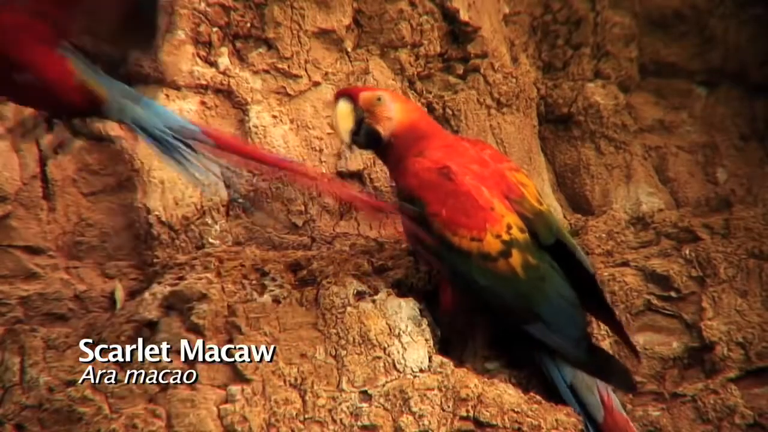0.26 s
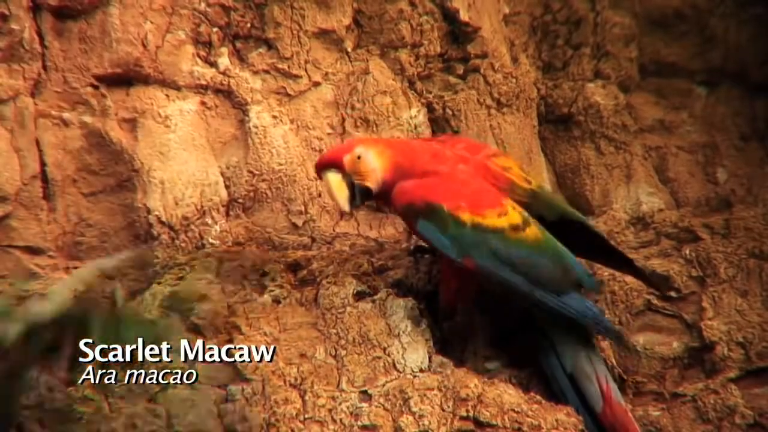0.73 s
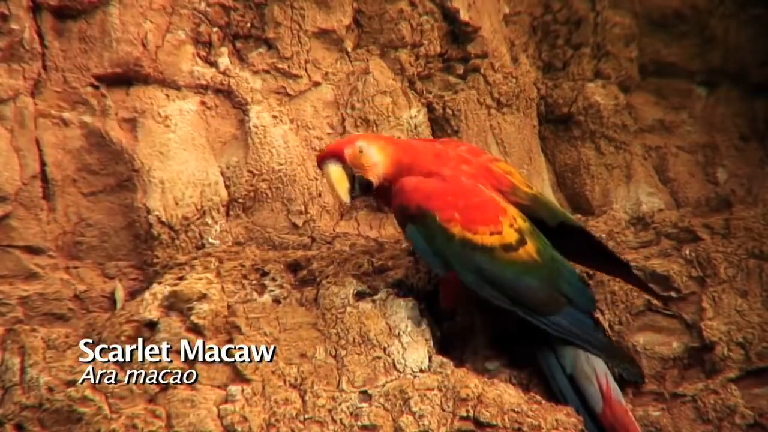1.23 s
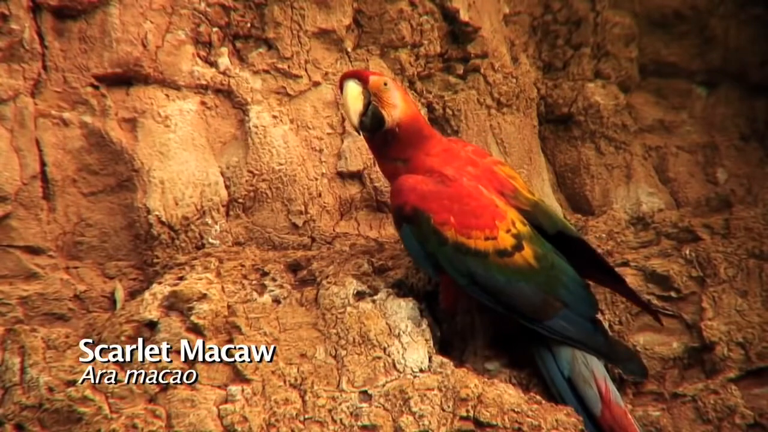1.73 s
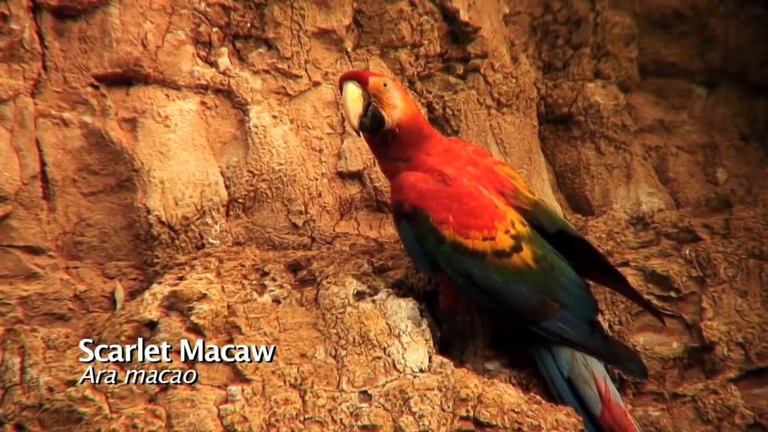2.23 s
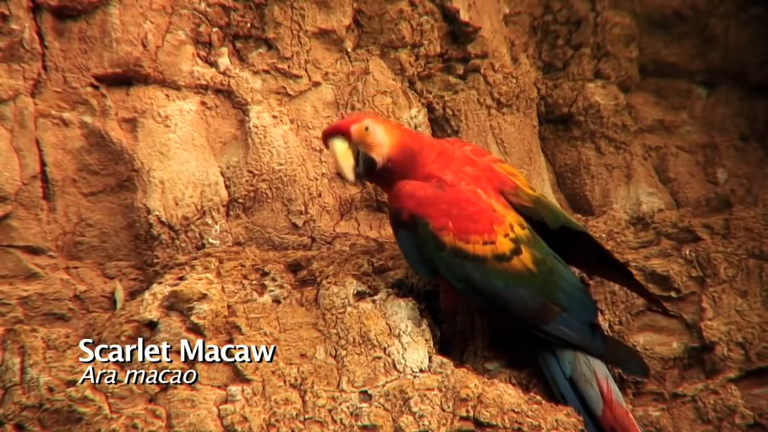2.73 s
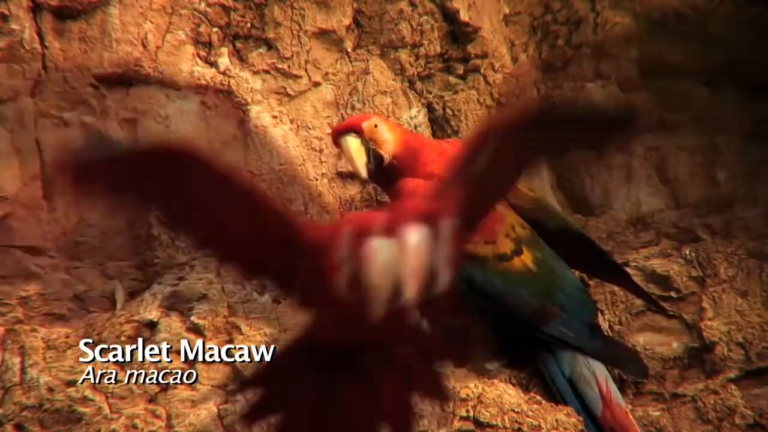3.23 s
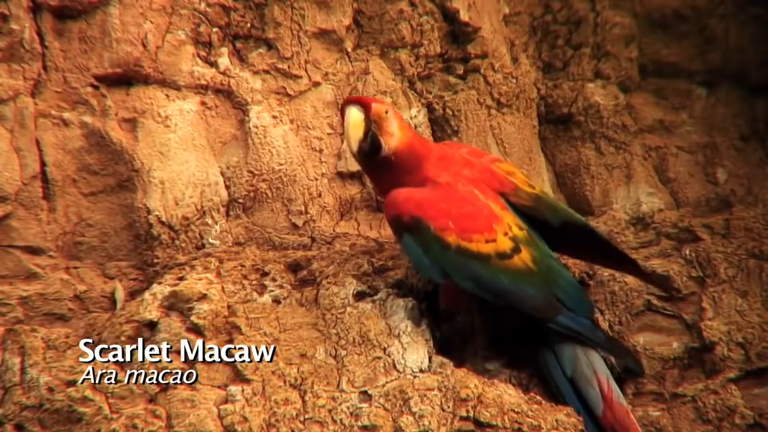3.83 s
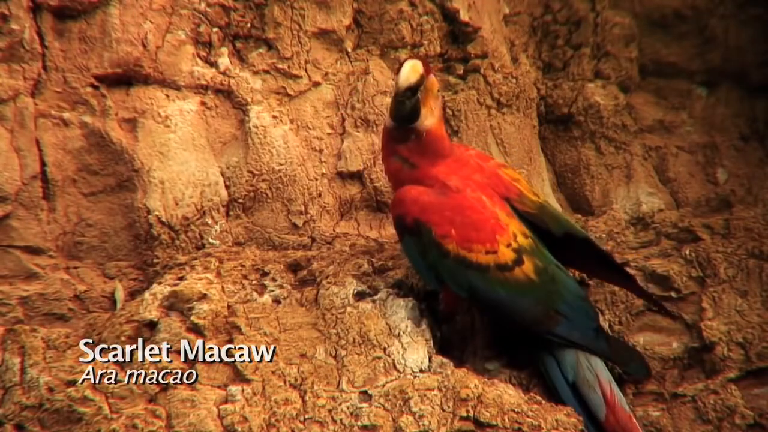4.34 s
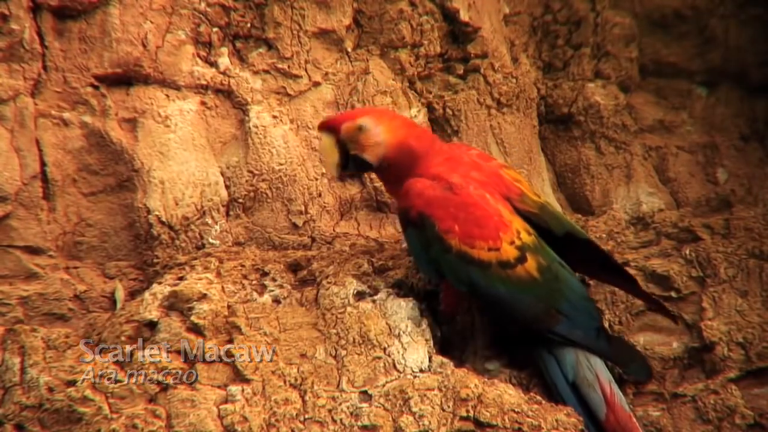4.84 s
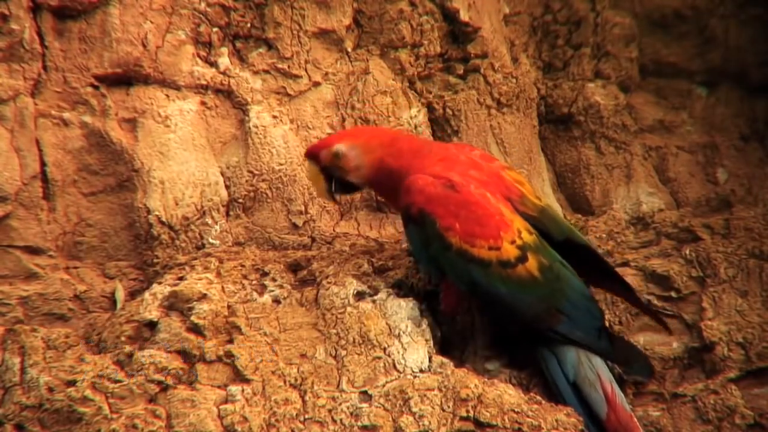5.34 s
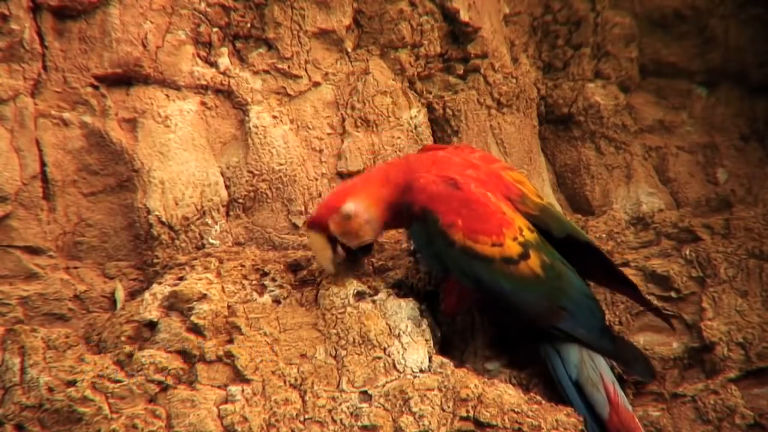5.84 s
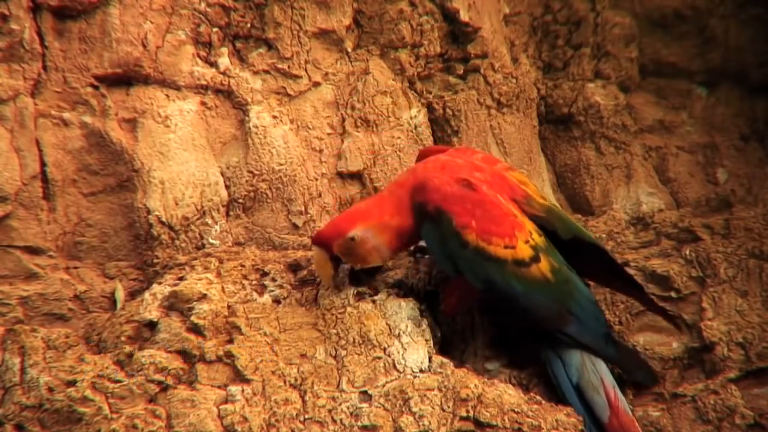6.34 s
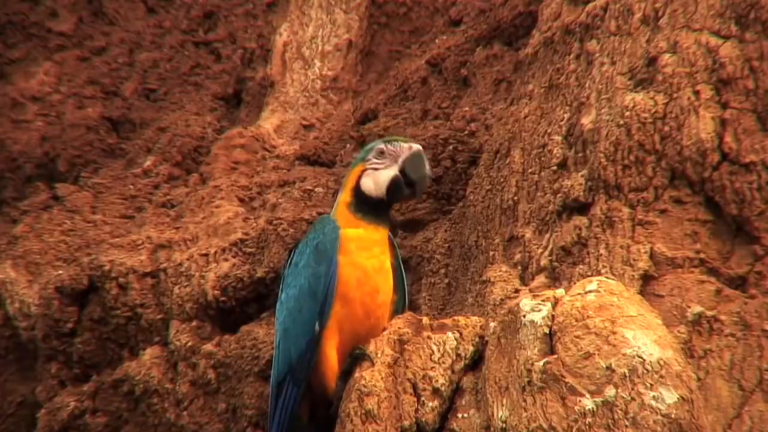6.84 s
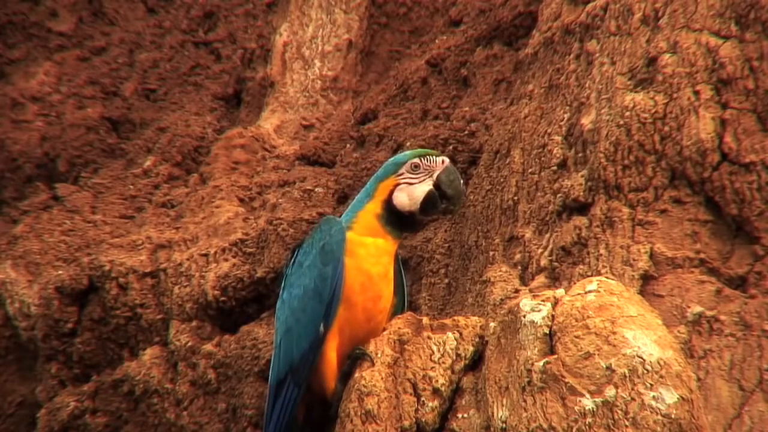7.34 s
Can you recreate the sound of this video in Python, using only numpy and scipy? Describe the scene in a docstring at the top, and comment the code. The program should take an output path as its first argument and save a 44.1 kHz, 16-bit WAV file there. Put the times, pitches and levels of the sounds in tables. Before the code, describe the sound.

A wide stereo outdoor scene of many macaws and parrots: far chatter swelling and sinking, nearer rasping squawks, quick screeches, tiny clucks and high chirps. Wings flutter and a few low puffs of air pass close. Loud squawks come early, dense screeching fills the middle, and it thins before chattering rises again. A steady high insect chorus, soft air and faint low rumble lie beneath, with a short natural echo.

```python
"""Far chatter, rustling feathers, a steady insect chorus and air come first: a flock on a forest clay cliff.
Macaws and parrots soon call over them: hoarse squawks, rattling screeches, a trilled cry, chirps and clucks.
Squawks, screeches and the cry are stacks of partials; chirps and clucks are short notes with an overtone.
Wing beats are low puffs; the bed is shaped noise. Trees and cliff answer the voices with a short echo."""
import sys
import numpy as np
from scipy import signal
from scipy.io import wavfile
from scipy.ndimage import uniform_filter1d

SR = 44100
rng = np.random.default_rng(int(sys.argv[2]) if len(sys.argv) > 2 else 0)


def convert_level_to_amplitude(level_db):
    """Map a level in decibels to its linear amplitude factor."""
    exponent = np.asarray(level_db, float) / 20
    return 10 ** exponent


def master(y):
    """Save y as 16-bit WAV."""
    cut = np.clip(np.atleast_2d(y).T, -1, 1)
    pcm = np.round(cut * 32767)  # scale
    wavfile.write(sys.argv[1], SR, pcm.astype(np.int16))


N = 334278

# how loud the far flock is, before each user's own offset: time_s [s], level_db [dB]
FLOCK = [(0, -31), (.55, -31), (1.6, -29), (2.8, -22.5), (3.4, -30.5), (3.8, -22.5), (4.02, -25.5),
         (4.2, -24), (4.8, -34), (5.7, -26), (6.3, -28.5), (7.1, -22.5), (7.58, -28.5)]


def unit(x):
    """Scales a signal to rms 1."""
    return x / np.sqrt(np.mean(np.abs(x) ** 2) + 1e-20)


def along(points, hz):
    """Reads a curve of (Hz, value) points on a log frequency axis."""
    f, v = np.transpose(points)
    return np.interp(np.log(hz + 1), np.log(f + 1), v, left=v[0], right=v[-1])


def at_times(points, t):
    """Reads a curve of (s, value) points at the times t."""
    return np.interp(t, *np.transpose(points))


def curves(rows):
    """Gives the first sample, then each column joined by straight lines from the first row to the last."""
    s, *columns = np.transpose(rows)
    n = np.arange(round(s[0] * SR), min(round(s[-1] * SR), N))
    return [n[0]] + [np.interp(n / SR, s, column) for column in columns]


def wobble(n, rate):
    """Makes a random curve of n samples by joining `rate` random knots a second."""
    knots = rng.standard_normal(int(n * rate / SR) + 2)
    return np.interp(np.arange(n) * rate / SR, np.arange(len(knots)), knots)


def rush(spectrum, patchy_db, size=512):
    """Makes stereo noise with patches of random gain: rms 1, then a little louder on the left."""
    # how alike left and right are: frequency_hz [Hz], likeness [-1 to 1]
    alike = [(60, 0.88), (180, 0.43), (550, 0.46), (1650, 0.59), (4970, -0.3), (15000, 0.41)]
    hz, _, z = signal.stft(rng.standard_normal((2, N)), SR, nperseg=size)
    patches = rng.standard_normal(z.shape[1:])
    patches = uniform_filter1d(uniform_filter1d(patches, 4, 0), 8, 1)
    inside = (hz >= spectrum[0][0]) & (hz <= spectrum[-1][0])
    color = convert_level_to_amplitude(along(spectrum, hz)) * inside
    z = z * convert_level_to_amplitude(patchy_db * unit(patches)) * color[:, None]
    # less likeness means more of the side signal
    turn = np.arccos(np.clip(along(alike, hz), -1, 1))[:, None] / 2
    mid, side = z[0] * np.cos(turn), z[1] * np.sin(turn)
    pair = signal.istft(np.array([mid + side, mid - side]), nperseg=size)[1][:, :N]
    return unit(pair) * convert_level_to_amplitude(np.array([[.7], [-.7]]))


def add(ports, start, voice, pan_db, fade_s=0.0052):
    """Places a voice between left and right with soft ends; positive pan_db leans left."""
    t = np.arange(len(voice)) / SR
    edge = np.clip(np.minimum(t, t[::-1]) / fade_s, 0, 1)
    ports[:, start:start + len(voice)] += voice * edge * convert_level_to_amplitude(np.array([[.5], [-.5]]) * pan_db)


def partials(pitch_hz, gains, hoarse, smear_hz, jitter):
    """Stacks partials of one pitch; hoarseness swaps each clean tone for a noisy, shaken copy."""
    n = len(pitch_hz)
    turn = 2 * np.pi * np.cumsum(pitch_hz * (1 + jitter * wobble(n, 150.4))) / SR
    shared = wobble(n, smear_hz)  # uneven closure of the syrinx shakes all partials together
    voice = 0
    for k, gain in enumerate(gains, 1):
        # high partials blur first
        clean = (1 - np.clip(hoarse, .03, 1)) ** (.5 + k * pitch_hz / 2500)
        phase = k * turn - 0.2744 * k * k  # the windpipe spreads each pulse in time
        rasp = 1.3 * (1 + .45 * shared) * np.sin(phase + 2.2 * wobble(n, smear_hz))
        # each partial's level wanders at random
        wandering_gain = gain * convert_level_to_amplitude(2 * wobble(n, 35))
        tone = np.sqrt(2 * clean) * np.sin(phase)
        voice = voice + wandering_gain * (tone + np.sqrt(1 - clean) * rasp)
    return voice / np.sqrt(sum(gain ** 2 for gain in gains))


def squawks():
    """Sounds squawks, caws and croaks as stacks lifted around two resonances, beak and throat."""
    beak_lift_db, throat_lift_db, lift_width_hz = 13, 16, 300
    # strength of a partial before the lifts: frequency_hz [Hz], level_db [dB]
    throat_color = [(250, -2.5), (500, -35.5), (750, -12.5), (900, -20), (1200, -7.5), (2500, -8.5),
                    (4500, -9.5), (5500, -25.5), (9000, -16), (13000, -50)]
    # squawks typed in detail, loud and faint, and a second voice under the cry, one table a call:
    # time_s [s], pitch_hz [Hz], level_db [dB], beak_hz [Hz], throat_hz [Hz],
    # hoarse [share, held within 0.03-1]
    detailed_calls = [
        [(.375, 373.3, -40, 2500, 740, 0.8), (.41, 384.3, -29, 2620, 1140, 0.5),
         (.44, 394.5, -20, 1430, 2630, 0.3), (.48, 413, -19.5, 1580, 2700, 0.4),
         (.505, 443.5, -19, 2660, 2250, 0.3), (.545, 448, -19.5, 2670, 2230, 0.15),
         (.565, 430.6, -20.5, 2150, 1750, .6), (.58, 405, -21.5, 2800, 1600, 0.4),
         (.61, 389.5, -23, 1930, 1590, 0), (.63, 356, -26.5, 2480, 1400, 0.3),
         (.655, 354, -31, 2430, 1090, 0.5)],
        [(.66, 1219, -36, 2450, 1230, 0.7), (.705, 1192, -26.5, 2400, 1190, 0.25),
         (.74, 1270, -25.5, 2480, 1240, .4), (.762, 1258, -24, 2550, 1275, 0.1),
         (.775, 1280, -45, 2580, 1290, .5)],
        [(.805, 1336, -40, 2640, 1320, .5), (.83, 1347, -26.5, 2700, 1350, .35),
         (.853, 1310, -26, 2600, 1300, .5), (.865, 1250, -42, 2500, 1250, .6)],
        [(.86, 995, -28, 2900, 1950, 0.8), (.885, 964, -18.5, 3060, 2100, 0.7), (.91, 886, -28, 3600, 1820, 0),
         (.935, 900, -28, 3560, 1900, 0.03), (.95, 1127, -16.5, 2270, 2270, 0.05),
         (.975, 1210, -49, 2270, 2260, 0)],
        [(1.17, 636.5, -37, 650, 650, 0.1), (1.2, 677, -36, 680, 680, 0.25),
         (1.222, 767, -22.5, 750, 2350, 0.23), (1.235, 722, -22, 750, 2120, 0.43),
         (1.25, 911, -18.5, 900, 1680, 1.34), (1.265, 900, -27, 900, 1610, 0.8),
         (1.285, 770, -43, 800, 1590, 1)],
        [(1.955, 388.8, -43, 1130, 1130, 1.1), (1.98, 392, -27, 1600, 1170, 0.7),
         (1.995, 396.6, -20, 2200, 1600, 0.7), (2.03, 403.8, -20, 2100, 1600, 0.6),
         (2.042, 524, -19, 1570, 2080, 0.8), (2.09, 526, -20.5, 1570, 2050, 0.46),
         (2.14, 529, -20.5, 2750, 1910, 0.8), (2.2, 520.6, -22.5, 1710, 2010, 1.06),
         (2.222, 544.5, -22.5, 1140, 1100, 0.5), (2.265, 538, -20, 2170, 1075, 0.2),
         (2.297, 520.5, -21, 2300, 1040, 0.03), (2.318, 484, -33.5, 2900, 1000, 0.07),
         (2.33, 439, -18, 1700, 1210, 1.1), (2.342, 412, -51, 1700, 900, .8)],
        [(2.352, 330.6, -34, 2200, 1650, 0.4), (2.368, 325.5, -24.5, 2190, 1600, 0.2),
         (2.4, 342, -23.5, 1990, 1430, 0.35), (2.42, 329.6, -30, 2030, 1340, .1),
         (2.45, 312, -33, 2040, 1270, 0), (2.465, 316, -54, 2000, 1250, 0.4)],
        [(4.59, 775.5, -26, 4700, 1600, 0.7), (4.61, 786, -31, 3150, 1560, 0.9),
         (4.655, 721, -24.5, 3520, 1450, 1), (4.675, 690.5, -27.5, 3450, 1390, 0.37),
         (4.712, 682, -24.5, 3400, 1370, 0), (4.735, 654, -31.5, 3620, 1300, 0.9),
         (4.76, 600, -29.5, 3740, 1270, 1), (4.775, 620, -52, 4300, 1220, .7)],
        [(5.8, 2650, -45, 5300, 5300, .9), (5.84, 2770, -36, 5600, 5600, 1.1), (5.87, 3210, -45, 6400, 6400, 1),
         (5.9, 2930, -53, 5900, 5900, .9), (5.92, 2650, -45, 5300, 5300, .9)],
    ]

    def near(hz, center_hz):
        return 1 / (1 + ((hz - center_hz) / lift_width_hz) ** 2)

    ports = np.zeros((2, N))
    for call in detailed_calls + caws() + croaks():
        start, hz, db, beak_hz, throat_hz, hoarse = curves(call)
        gains = []
        for k in range(1, max(int(7000 / hz.max()), 3)):
            beak_db = beak_lift_db * near(k * hz, beak_hz)
            throat_db = throat_lift_db * near(k * hz, throat_hz)
            gains.append(convert_level_to_amplitude(along(throat_color, k * hz) + np.maximum(beak_db, throat_db)))
        voice = partials(hz, gains, hoarse, smear_hz=330, jitter=.01)
        add(ports, start, convert_level_to_amplitude(db) * voice, pan_db=0.0)
    return ports


def caws():
    """Describes gliding caws, the beak tuned to the second partial and the throat to the first."""
    # start_s [s], length_s [s], level_db [dB, before swell and tiring], first_hz [Hz], last_hz [Hz]
    caw_rows = [(2.95, 0.15, -31.5, 572.4, 504), (3.657, 0.19, -29.5, 609.6, 513),
                (4.17, 0.022, -33, 687, 540), (4.222, 0.034, -25.5, 640, 564),
                (4.235, 0.036, -33, 387, 456), (4.27, .05, -24.5, 630, 463),
                (4.991, 0.25, -40.5, 567.6, 572), (7.241, 0.29, -36.5, 586.5, 537.4)]
    return [shaped(s, length, db, (hz, end_hz), (2 * hz, 2 * end_hz), (hz, end_hz))
            for s, length, db, hz, end_hz in caw_rows]


def croaks():
    """Describes slightly sagging croaks through a wide-open beak, with a single fixed resonance."""
    sag_per_s = 0.36  # share of pitch lost a second
    # start_s [s], length_s [s], level_db [dB, before swell and tiring], first_hz [Hz], beak_hz [Hz]
    croak_rows = [(1.136, 0.13, -32, 930, 2550), (5.421, 0.049, -30, 614, 2640),
                  (5.509, 0.044, -33.5, 615, 2450), (5.551, 0.055, -27.5, 460, 2800),
                  (6.605, 0.064, -29, 435, 3030), (6.535, 0.026, -29.5, 390, 2900),
                  (7.03, .03, -34, 740, 3300), (7.18, 0.02, -37, 550, 3300), (6.84, 0.021, -25, 540, 2730)]
    return [shaped(s, length, db, (hz, hz * (1 - sag_per_s * length)), (beak, beak), (beak, beak))
            for s, length, db, hz, beak in croak_rows]


def shaped(start, length, db, pitch, beak, throat):
    """Describes a short call: it swells, tires and fades, and (first, last) Hz pairs glide."""
    attack_s, release_s, rise_db, fall_db = 0.018, 0.036, 8, 4
    tire_db_per_s = 17
    hoarse_ends, hoarse_clearest, clear_at = .32, .08, .6  # clear_at is a share of the length
    t = np.unique(np.clip([0, attack_s, clear_at * length, length - release_s, length], 0, length))
    swell_db = -rise_db * np.clip(1 - t / attack_s, 0, 1)
    fade_db = -fall_db * np.clip(1 - (length - t) / release_s, 0, 1)
    level = db - tire_db_per_s * t + swell_db + fade_db

    def glide(ends):
        return ends[0] + (ends[1] - ends[0]) * t / length

    hoarse = np.interp(t / length, [0, clear_at, 1], [hoarse_ends, hoarse_clearest, hoarse_ends])
    return np.transpose([start + t, glide(pitch), level, glide(beak), glide(throat), hoarse])


def screeches():
    """Sounds high rasping tones that arch in pitch, rattle, and start faster than they end."""
    # near syllables: middle_s [s], level_db [dB, before the swell], pitch_hz [Hz, before the arch],
    # length_s [s, before 0.03 s is added], second_db [dB, second partial before a 6 dB cut]
    near_rows = [(1.743, -37, 1684, 0.11, 8), (1.805, -33.5, 1522, 0.072, 6.5),
                 (2.502, -30, 1513, 0.026, 0.5), (2.573, -24.5, 1587, 0.072, -5.5),
                 (2.631, -30, 1382, 0.021, 0), (2.732, -27.5, 1500, 0.1, -13),
                 (2.83, -35.5, 1656, 0.025, 8), (2.86, -26, 1512, 0.036, -5), (2.927, -27, 1600, 0.049, -1),
                 (3.045, -29.5, 1507, 0.058, -24), (3.13, -31.5, 1756, 0.077, -8),
                 (3.376, -34.5, 1860, 0.12, -0.5), (3.54, -32.5, 1613, 0.026, 9),
                 (3.57, -27.5, 1642, 0.038, 2.5), (3.627, -29, 1600, 0.035, -3.5),
                 (3.793, -30, 1550, 0.057, -16), (3.88, -27, 1583, 0.15, 1), (4.082, -29, 1502, 0.027, -22),
                 (4.125, -26.5, 1664, 0.067, -4), (4.209, -25, 1547, .13, -0.5),
                 (4.271, -28, 1708, 0.065, 4), (4.548, -23.5, 1738, 0.05, -0.5),
                 (4.579, -27.5, 1583, .015, 8), (4.614, -25.5, 1670, 0.018, 2),
                 (4.657, -26.5, 1623, 0.02, 0), (4.751, -27, 1747, 0.018, -1),
                 (5.088, -33, 1682, 0.071, -0.5), (5.158, -30.5, 1652, 0.12, -9),
                 (5.658, -31.5, 1652, 0.062, -21), (5.763, -31, 1587, 0.08, -30),
                 (5.831, -34.5, 1377, 0.032, -11), (5.901, -34, 1600, 0.073, -6),
                 (6.547, -37, 1396, 0.061, 8), (6.647, -29, 1716, 0.095, -22),
                 (6.698, -30, 1600, 0.072, -21), (6.815, -29.5, 1600, 0.069, -34),
                 (6.882, -28.5, 1548, 0.06, -17), (6.948, -27.5, 1480, 0.066, -13),
                 (7.04, -28.5, 1660, 0.13, -6), (7.122, -34, 1430, 0.047, -11),
                 (7.183, -28, 1586, 0.027, -5), (7.232, -32, 1692, 0.068, 1), (7.347, -29, 1630, 0.1, -10),
                 (7.435, -35, 1600, 0.042, 1)]
    # where the screeching birds sit: time_s [s], left_over_right_db [dB]
    perch = [(0, -7), (2.4, 3), (3.3, 6.5), (3.8, 2), (4.1, 0), (6, 1), (6.4, -8), (6.85, 4.5),
             (7.58, -0.5)]
    ports = np.zeros((2, N))
    for s, db, hz, length, second_db in near_rows + far_screeches():
        u = np.linspace(0, 1, int((length + .03) * SR))
        swell = np.minimum(u / .05, 1) * np.clip((1 - u) / .55, 0, 1)
        partials_db = [0, second_db - 6.0] + [second_db - 14.5 - 6.9 * k for k in range(3)]
        gains = [convert_level_to_amplitude(own_db) for own_db in partials_db]
        rattle = unit(convert_level_to_amplitude(1.6 * wobble(len(u), 116.6)))
        pitch = hz * (1 + 0.0514 * np.sin(np.pi * u) - .035)
        tone = partials(pitch, gains, hoarse=.27, smear_hz=330, jitter=.014)
        start = max(round(s * SR) - len(u) // 2, 0)
        add(ports, start, convert_level_to_amplitude(db) * swell * rattle * tone, at_times(perch, s), fade_s=0.0016)
    return ports


def far_screeches(count=40):
    """Draws random faint syllables, louder where the flock chatters more."""
    average_db, center_hz = -43, 1600
    when, size, pitch, length, bright = rng.random((count, 5)).T
    s = when * (N / SR - .1)
    times, flock_db = np.transpose(FLOCK)
    db = average_db + np.interp(s, times, flock_db) - flock_db.mean() + 6 * (size - .5)
    hz = center_hz * (1 + .16 * (pitch - .5))
    return list(zip(s, db, hz, 0.02 + .07 * length, -4 - 18 * bright))


def cry(trill_hz=66):
    """Sounds a stack lifted around a moving beak resonance, its loudness pulsing in a regular trill."""
    beak_lift_db, beak_width_hz, trill_depth = 27, 1100, 0.21
    # time_s [s], pitch_hz [Hz], level_db [dB, before the trill], beak_hz [Hz]
    cry_rows = [(.655, 1044, -42, 2100), (.685, 1075, -30, 2180), (.72, 1170, -35, 2380),
                (.75, 1124, -29, 2700), (.785, 1074, -24.5, 2500), (.805, 1087, -25, 2250),
                (.83, 1145, -22.5, 2550), (.855, 1203, -17, 2780), (.872, 1060, -21, 2500)]
    # level of each partial before the beak's lift [dB]
    partials_db = [-3, -1.5, -1.5, -31, -27]
    ports = np.zeros((2, N))
    start, hz, db, beak_hz = curves(cry_rows)
    gains = []
    for k, own_db in enumerate(partials_db, 1):
        lift_db = beak_lift_db / (1 + ((k * hz - beak_hz) / beak_width_hz) ** 2)
        gains.append(convert_level_to_amplitude(lift_db + own_db))
    t = (np.arange(len(hz)) + start) / SR
    trill = 1 + trill_depth * np.cos(2 * np.pi * trill_hz * t + 0.72)
    voice = partials(hz, gains, hoarse=.3, smear_hz=350, jitter=.012)
    add(ports, start, convert_level_to_amplitude(db) * trill * voice, pan_db=-.3)
    return ports


def throat_hiss(voices):
    """Adds broad noise of turbulent air in the throat, stronger the louder the birds call."""
    # color of the hiss: frequency_hz [Hz], relative_db [dB per Hz]
    hiss_color = [(500, -86), (1000, 3), (1700, -4.5), (3300, 5), (5000, -7.5), (9000, -20), (12500, -41),
                  (15500, -52)]
    effort = np.sqrt(np.abs(uniform_filter1d(voices ** 2, size=500, axis=1)))
    return convert_level_to_amplitude(-7.5) * effort * rush(hiss_color, patchy_db=7.5)


def short_note(s, db, hz, length, rise, pan_db, overtone_db=-34):
    """Makes one short gliding note under a rounded swell, a little unsteady, centred on s."""
    u = np.linspace(-.5, .5, int(length * SR))
    waver = 1 + .005 * wobble(len(u), 215)  # share of pitch
    turn = 2 * np.pi * np.cumsum(hz * 2 ** (rise * u) * waver) / SR
    flutter_db = 2 * wobble(len(u), 150)
    tone = np.sin(turn) + convert_level_to_amplitude(overtone_db) * np.sin(2 * turn)
    note = convert_level_to_amplitude(db + flutter_db) * np.cos(np.pi * u) * tone
    start = int(np.clip(round((s - length / 2) * SR), 0, N - len(u)))
    return start, note, pan_db


def chirps_and_clucks():
    """Sounds near chirps, whistles and very short clucks, and many faint chirps from farther off."""
    spread_db = 10  # whole range of left-right differences
    # near chirps and whistles, and very short clucks near 1550 Hz:
    # middle_s [s], level_db [dB, peak before flutter], pitch_hz [Hz], length_s [s], rise [octaves]
    near_rows = [(2.788, -19.5, 1500, .022, -0.012), (2.887, -14, 1550, .009, -0.022),
                 (2.906, -15, 1550, .012, -0.083), (3.517, -18, 1580, .012, 0),
                 (3.527, -14, 1580, .011, 0.017), (3.602, -12, 1520, .009, -0.03),
                 (3.621, -18, 1560, .014, -0.057), (4.057, -23, 1500, .01, 0.0027),
                 (4.557, -11, 1680, .009, -0.026), (0.827, -30, 5250, .02, 0),
                 (7.118, -31.5, 4200, .03, -.05), (7.128, -35, 2490, 0.028, 0),
                 (7.232, -33, 2550, 0.026, 0.045), (1.111, -25.5, 2580, 0.051, -0.086),
                 (2.544, -22.5, 3480, 0.015, 0.078), (2.824, -40, 5000, .04, -0.066),
                 (2.863, -21, 2895, 0.054, 0.046), (3.576, -23.5, 2880, 0.029, -0.048),
                 (3.861, -25, 5330, 0.021, -0.012), (3.973, -32, 4900, 0.043, -0.13),
                 (4.261, -33, 5230, 0.038, .02), (4.4, -35, 4080, .049, 0.063),
                 (4.445, -36, 4100, 0.034, .1), (4.476, -37, 4850, .035, .08),
                 (4.585, -27, 6350, 0.022, -0.02), (4.627, -24, 6000, 0.014, -0.11),
                 (4.643, -29, 2900, .06, 0), (4.694, -26.5, 3430, 0.063, 0.00077),
                 (5.703, -32.5, 3100, 0.055, -0.0057), (6.888, -30, 2940, 0.034, 0.01),
                 (6.947, -29, 3660, 0.03, 0), (7.201, -29, 6110, 0.032, -0.063),
                 (7.339, -37, 3270, 0.12, -0.02), (7.48, -36, 3170, 0.16, 0.0081)]
    ports = np.zeros((2, N))
    for row, side in zip(near_rows, rng.random(len(near_rows))):
        add(ports, *short_note(*row, spread_db * (side - .5)))
    for when, size, pitch, length, rise, side in rng.random((170, 6)):
        faint = short_note(when * N / SR, -49 + 9 * size, 1000 * 2 ** (1.9 * pitch),
                           .015 + .035 * length, .15 * (rise - .5), 8 * (side - .5), overtone_db=-14)
        add(ports, *faint)
    return ports


def forest(x):
    """Echoes with noise tails, one for each side, in which each frequency dies at its own speed."""
    # frequency_hz [Hz], time_to_fall_60_db_s [s]
    decay = [(300, 0.033), (2000, 0.48), (8000, 0.64)]
    hz, t, z = signal.stft(rng.standard_normal((2, SR // 2)), SR, nperseg=256)
    dying = convert_level_to_amplitude(-60 * t / along(decay, hz)[:, None])
    tail = signal.istft(z * dying, SR, nperseg=256)[1]
    return signal.fftconvolve(x, tail / np.linalg.norm(tail[0]), axes=1)[:, :N]


def wing_beats():
    """Pushes one low puff of air at both sides for each close wing beat."""
    # start_s [s], level_db [dB, before a 13 dB lift and the puff's own shape]
    beats = [(1.15, -32), (2.006, -32), (2.703, -32), (3.964, -28)]
    ports = np.zeros((2, N))
    u = np.arange(SR // 20) / SR / 0.00071  # time in steps of 0.71 ms
    puff = (1 - u) * np.exp(-u) * np.minimum(u, 1)
    for s, db in beats:
        add(ports, round(s * SR), convert_level_to_amplitude(db + 13.0) * puff, pan_db=1, fade_s=0.00024)
    return ports


def far_chatter(t):
    """Blends the distant flock into patchy noise that swells and sinks with its chatter."""
    # frequency_hz [Hz], relative_db [dB per Hz]
    chatter_color = [(180, -47), (300, -25), (419, -34), (684, -15), (748, -14), (1600, -2.5), (1960, -12),
                     (2120, -21), (2930, -9.5), (4480, -18.5), (6500, -32.5), (8450, -76), (14300, -120)]
    level_db = at_times(FLOCK, t) - 7.0 + 0.85 * wobble(N, 16)
    return convert_level_to_amplitude(level_db) * rush(chatter_color, patchy_db=2.5)


def feathers(t):
    """Rustles as fluttering noise: a faint constant stir and stronger flurries of wings."""
    stir_db, edge, lift_db, flutter_db = -68, 2.5, 16.5, 3  # stir before lift; edge: flurry squareness
    # middle_s [s], length_s [s], level_db [dB, before lift_db and flutter]
    flurry_rows = [(0.09, 0.25, -49), (0.89, 0.16, -52), (2.713, 1, -57.5), (3.88, 0.56, -54),
                   (4.224, 0.22, -51.5), (4.627, 0.14, -53), (5.832, 0.18, -56), (6.637, 0.11, -52),
                   (7.01, 0.45, -53)]
    # frequency_hz [Hz], relative_db [dB per Hz]
    feather_color = [(180, -57), (300, -21), (1390, -15), (1560, -6), (2980, -7.5), (3570, -7.5),
                     (4350, -2.5), (8990, -17), (15500, -50)]
    stirring = convert_level_to_amplitude(stir_db)
    for s, length, db in flurry_rows:
        stirring = stirring + convert_level_to_amplitude(db) * np.exp(-np.abs(2 * (t - s) / length) ** edge)
    return stirring * convert_level_to_amplitude(lift_db + flutter_db * wobble(N, 30)) * rush(feather_color, patchy_db=4.5)


def insects():
    """Holds a steady high chorus as a narrow band of noise with a quick slight flutter."""
    # frequency_hz [Hz], relative_db [dB per Hz]
    insect_color = [(6300, -37), (6750, -5.5), (7200, 4.5), (7500, 0), (7900, -14.5), (8400, -27)]
    return convert_level_to_amplitude(-42.0 + 0.86 * wobble(N, 110)) * rush(insect_color, patchy_db=2.0)


def forest_air():
    """Fills the forest with broad, almost steady noise."""
    # frequency_hz [Hz], relative_db [dB per Hz]
    air_color = [(76, -60), (130, -16), (450, -13), (1620, -16), (2150, -6.5), (5720, -10.5), (7280, -10.5),
                 (8540, -23.5), (14400, -40), (15600, -75)]
    return convert_level_to_amplitude(-42.0 + 0.15 * wobble(N, 1.86)) * rush(air_color, patchy_db=5.0)


def rumble(t):
    """Breathes low noise that follows a slow breeze."""
    # time_s [s], level_db [dB, before a random wobble]
    breeze = [(0, -60), (.6, -54), (1.6, -61), (3.4, -63), (4.6, -57), (7.58, -61)]
    # frequency_hz [Hz], relative_db [dB per Hz]
    rumble_color = [(18, -27), (30, -2), (50, -4), (80, -3.5), (140, -9), (220, -10)]
    level_db = at_times(breeze, t) + 2.2 * wobble(N, 7)
    return convert_level_to_amplitude(level_db) * rush(rumble_color, patchy_db=1.0, size=4096)


def background():
    """Adds up far chatter, feathers, insects, air and a low rumble."""
    t = np.arange(N) / SR
    return far_chatter(t) + feathers(t) + insects() + forest_air() + rumble(t)


def scene():
    """Lets voices reach the left a moment early, then adds the forest's echo, wings and background."""
    late_samples = 2  # delay of the right side
    voices = squawks() + screeches() + cry()
    voices = voices + throat_hiss(voices) + chirps_and_clucks()
    voices[1] = np.roll(voices[1], late_samples)
    return voices + convert_level_to_amplitude(-9) * forest(voices) + wing_beats() + background()


def low_pass(x):
    """Removes everything above the highest recorded frequency."""
    return signal.sosfilt(signal.butter(12, 15250, fs=SR, output="sos"), x)


def record(dry, top=.6):
    """Rounds off the highest peaks, as the camera does, so that none passes `top`."""
    rounded = dry / (1 + np.abs(dry / top) ** 4) ** .25
    return low_pass(rounded)


dry = scene()
out = record(dry)
master(out)
```